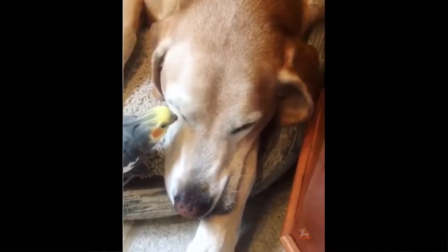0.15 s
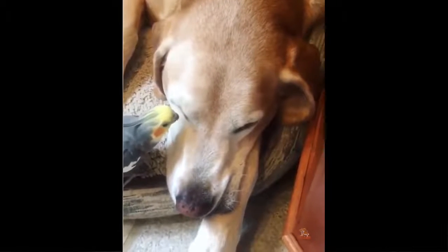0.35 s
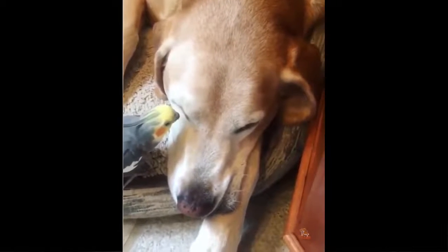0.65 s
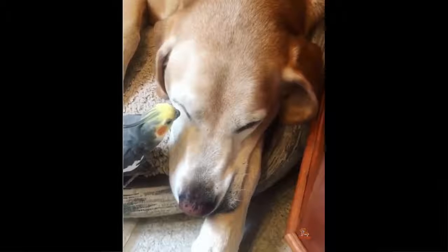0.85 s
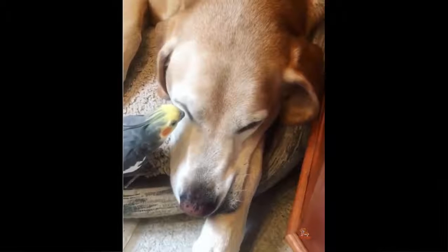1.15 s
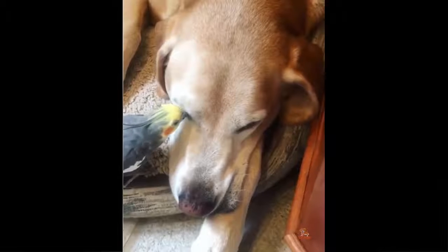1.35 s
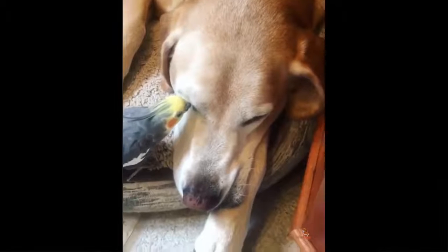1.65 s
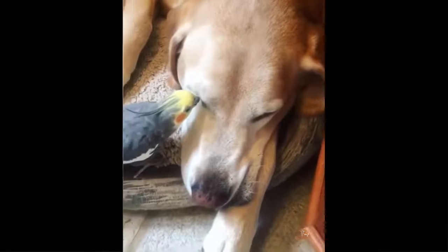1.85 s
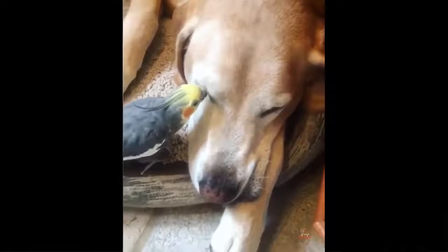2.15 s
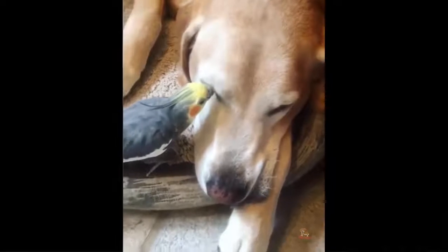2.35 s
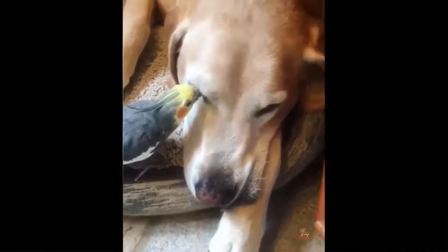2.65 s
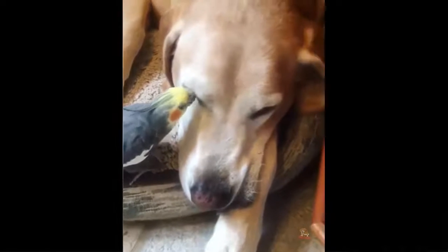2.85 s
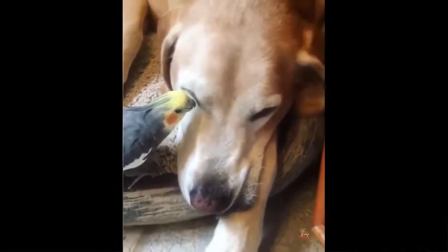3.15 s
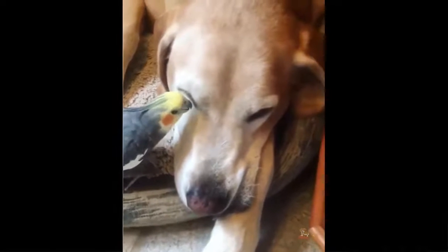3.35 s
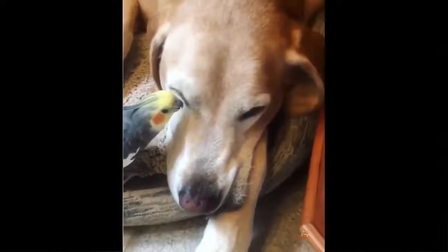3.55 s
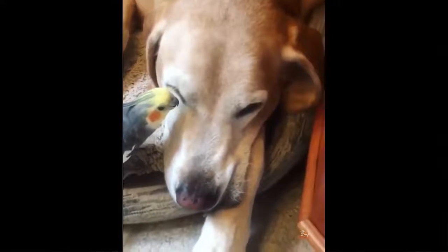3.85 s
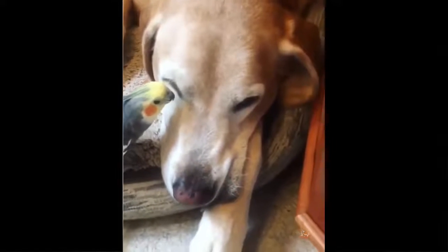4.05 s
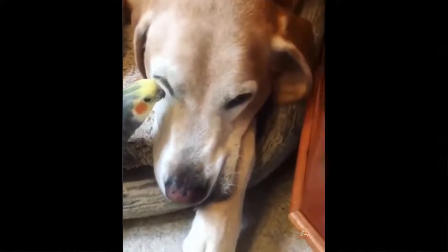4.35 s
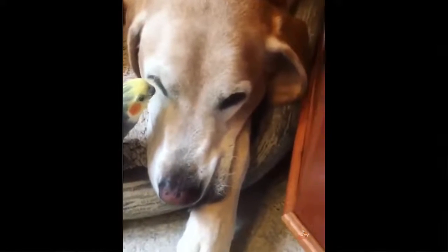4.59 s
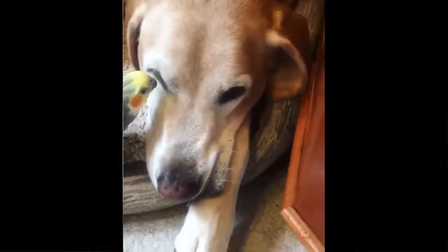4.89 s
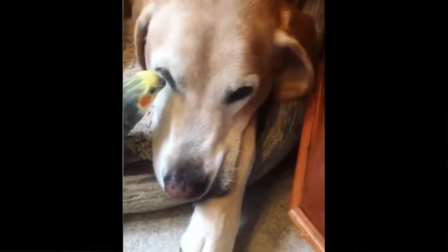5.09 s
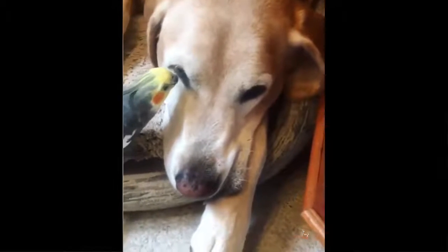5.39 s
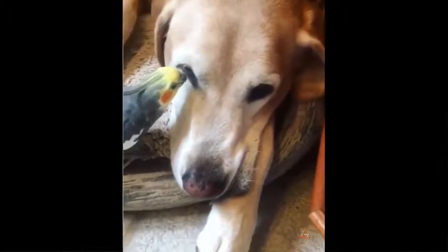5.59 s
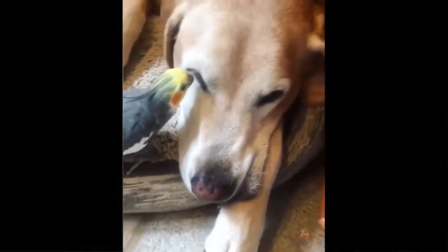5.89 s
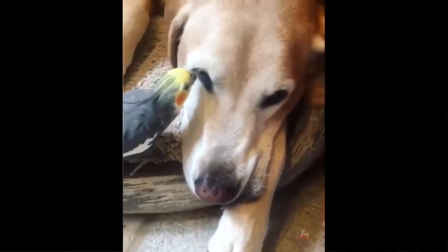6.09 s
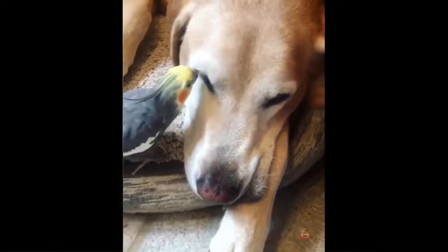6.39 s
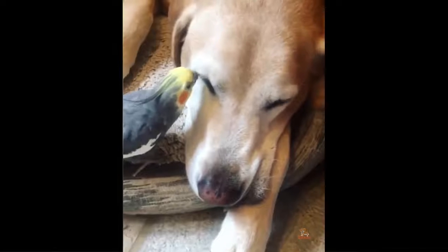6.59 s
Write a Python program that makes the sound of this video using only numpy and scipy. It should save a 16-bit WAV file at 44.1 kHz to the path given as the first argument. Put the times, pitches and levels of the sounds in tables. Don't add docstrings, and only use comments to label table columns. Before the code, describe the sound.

A small pet parrot whistles about a metre from a phone in a furnished room. The opening catches the tail of a sliding whistle, a rough fluttering gasp near 0.1 s, then swoops from 0.24 to 0.6 s, falling steeply from around 2.3 to 1.3 kHz, the second curving back up. A low floor rumble swells slightly around 0.6 s during the pause. A lone chirp comes at 1.5 s, then short piped chirps near 1.5 to 1.8 kHz from 1.8 to 3.4 s, some rising, some arching. Fast swoops return from 3.45 to 4.1 s with a small breathy gasp, the last dipping and climbing. After a gap, bright chirps run from 4.9 to 6.55 s, mostly in pairs. Very faint feather rustles fall between chirps. Notes are nearly pure, crisp at the attack, with a half-second room ring over quiet appliance hum, rumble and soft hiss.

```python
import sys
import numpy as np
from scipy import signal
from scipy.fft import rfft, irfft
from scipy.io import wavfile
from scipy.ndimage import uniform_filter1d

SR = 44100
rng = np.random.default_rng(int(sys.argv[2]) if len(sys.argv) > 2 else 0)


def to_linear_factor(level_db):
    exponent = np.asarray(level_db, float) / 20
    return 10 ** exponent


def unload_wav(signal):
    wavfile.write(
        sys.argv[1],
        SR,
        np.round(np.clip(np.atleast_2d(signal).T, -1, 1) * 32767).astype(np.int16),
    )


N = 296793
PRE = int(.1 * SR)
BLOCK = 12000


def on_log(hz, table, column=1):
    table = np.array(table)
    return np.interp(np.log(np.maximum(hz, 1)), np.log(table[:, 0]), table[:, int(column)])


def noise(size, colour):
    full = max(size, BLOCK)
    spectrum = rfft(rng.standard_normal(full))
    x = irfft(spectrum * to_linear_factor(on_log(np.fft.rfftfreq(full, 1 / SR), colour)), full)
    return x[:size] / x.std()


def walk(size, rate):
    k = max(int(SR / rate), 2)
    x = uniform_filter1d(rng.standard_normal(max(size, BLOCK)), k)
    return uniform_filter1d(x, k)[:size] * np.sqrt(1.57 * k)


def add(out, s, x):
    i = max(PRE + int(s * SR), 0)
    out[i:i + len(x)] += x[:len(out) - i]


def whistle(note, jitter=.0035, shimmer_db=4.):
    # frequency in Hz, gain in dB.
    beak_tone = [(600, -5.5), (2500, 15.5), (3700, 2.5), (4500, -1), (5300, -5.5), (6200, -11.5),
                 (7300, -21.5), (8300, -13), (9500, -14), (11500, -5.5), (13300, -3), (13900, -9),
                 (14400, -40)]
    # centre in Hz, width in Hz, gain in dB.
    side_branches = [(3800, 350, -18), (5350, 300, -15), (8300, 700, -14)]
    attack_s, release_s = .0025, .004
    air_db, air_s = -28, .013
    dive_air = .45

    s, *columns = np.transpose(note)
    t = np.arange(s[0], s[-1] + release_s, 1 / SR)
    curves = [uniform_filter1d(np.interp(t, s, c), 180, mode="nearest") for c in columns]
    hz, db, octave_db, mid_db, top_db = curves

    dive = np.clip(-np.gradient(np.log(hz)) * SR / 12, 0, 1)
    hz = hz * (1 + jitter * (1 + 2 * dive) * walk(len(t), 380))
    phase = 2 * np.pi * np.cumsum(hz) / SR

    order = np.arange(2, 12)[:, None]
    overtone_hz = order * hz
    beak = to_linear_factor(on_log(overtone_hz, beak_tone))
    top = np.clip((overtone_hz - 7500) / 2000, 0, 1) * (order > 2)
    mid = (1 - top) * (order > 2)
    size = 0
    for part, part_db in [(mid, mid_db), (top, top_db)]:
        shaped = part * beak
        size = size + to_linear_factor(part_db) * shaped / np.sqrt(np.sum(shaped ** 2, axis=0))
    size[0] = to_linear_factor(octave_db)
    for notch_hz, width_hz, notch_db in side_branches:
        size = size * to_linear_factor(notch_db * np.exp(-((overtone_hz - notch_hz) / width_hz) ** 2))

    wander = np.array([walk(len(t), 500) + walk(len(t), 60) for _ in order])
    flicker_db = (1 + .8 * dive) * shimmer_db * np.sqrt((order - 1.7) / 5) * wander
    flicker = to_linear_factor(-5 * dive + flicker_db)
    overtones = np.sum(size * flicker * np.sin(order * (phase + 2.1)), axis=0)
    tone = np.sin(phase) + overtones

    leak = np.exp(-((t - s[0]) / air_s) ** 2) + .06 + dive_air * dive
    air = to_linear_factor(air_db) * noise(len(t), beak_tone) * leak
    attack = np.clip((t - s[0]) / attack_s, 0, 1)
    release = np.clip((t[-1] - t) / (2 * release_s), 0, 1)
    return to_linear_factor(db) * attack * release * (np.sqrt(2) * tone + air)


def chirp(s, length, top_hz, db, bright_db, rule):
    first_hz, climb_s, sag, bright_s, upper_db, fade_db = rule
    least_climb = .008
    scoop, scoop_s = .025, .004
    sag_after_s, fade_s = .041, .01
    waver_share, waver_rate = .011, 130
    start_db, swell_s, closing_s = -3, .014, .009
    # octave, overtones to 8 kHz and above 8 kHz, in dB against the note
    open_db, closed_db, end_db = (-4, -21, -38), (-28, -31, -38), (-26, -40, -52)
    throat_hz, throat_width_hz, throat_db = 3500, 140, 30

    t = np.linspace(0, length, 40)
    first_hz = min(first_hz, top_hz * (1 - least_climb))
    hz = first_hz + (top_hz - first_hz) * np.clip(t / climb_s, 0, 1)
    hz = hz * (1 - sag * np.maximum(t - sag_after_s, 0))
    hz = hz * (1 - scoop * np.exp(-t / scoop_s))
    waver = walk(BLOCK, waver_rate)[(t * SR).astype(int)]
    hz = hz * (1 + waver_share * (waver - waver.mean()) * np.clip(t / swell_s, 0, 1))

    swell = start_db * np.clip(1 - t / swell_s, 0, 1)
    fade = fade_db * np.clip(1 - (length - t) / fade_s, 0, 1)
    closing = [bright_s, bright_s + closing_s, max(length, bright_s + 2 * closing_s)]
    octave, mid, top = (np.interp(t, closing, c) for c in zip(open_db, closed_db, end_db))
    lift = throat_db * np.exp(-((2 * hz - throat_hz) / throat_width_hz) ** 2)
    octave = bright_db + np.minimum(octave + lift, open_db[0])
    mid = mid + upper_db + bright_db / 2
    return np.transpose([s + t, hz, db + swell + fade, octave, mid, top + upper_db / 2])


def chirps(bird):
    # start in seconds, length in seconds, top pitch in Hz, level in dB, brightness in dB.
    openers = [(1.828, .051, 1525, -28, 0), (4.889, .048, 1540, -25.5, 4), (5.229, .043, 1492, -26, -2),
               (5.657, .049, 1540, -26, 1), (6.219, .049, 1635, -27, 4)]
    followers = [(1.966, .036, 1510, -27, -1), (2.525, .056, 1445, -33, 1), (2.972, .034, 1462, -29.5, -3),
                 (5.379, .034, 1425, -29.5, -2), (5.807, .035, 1445, -28.5, 2), (6.370, .036, 1490, -29, 3),
                 (6.527, .033, 1480, -28.5, 1)]
    climbers = [(2.095, .041, 1675, -27, 3), (3.082, .036, 1775, -26.5, 1), (5.929, .04, 1730, -25.5, 2)]
    arches = [(2.378, .053, 1600, -27.5, 3), (2.818, .064, 1640, -28, 2), (3.335, .07, 1575, -26.5, -1)]
    leaps = [(1.478, .066, 1635, -29, 1)]
    # first pitch in Hz, climb in seconds, sag in share of pitch per second,
    # bright time in seconds, upper overtones in dB, end fade in dB.
    opener_rule = (1500, .045, 0, .005, -3, -3)
    follower_rule = (1470, .012, 0, .015, 2, -5)
    climber_rule = (1480, .028, 0, .008, 3, -6)
    arch_rule = (1520, .02, 6, .004, -4, -3)
    leap_rule = (1530, .012, 0, .004, -5, -4)
    kinds = [(openers, opener_rule), (followers, follower_rule), (climbers, climber_rule),
             (arches, arch_rule), (leaps, leap_rule)]
    for rows, rule in kinds:
        for row in rows:
            add(bird, row[0], whistle(chirp(*row, rule)))


def slide(curve, octave_db):
    # pitch in Hz, then octave, overtones to 8 kHz and above 8 kHz, in dB against the note.
    slide_colour = [(1280, -20, -28, -42), (1500, -22, -31, -40), (1760, -12, -25, -33),
                    (1980, -29, -31, -32), (2400, -29, -34, -21)]
    climb_db, full_climb = -8, 8.
    s, hz, db = np.transpose(curve)
    t = np.linspace(s[0], s[-1], 60)
    hz, db = np.interp(t, s, hz), np.interp(t, s, db)
    climb = np.clip(np.gradient(np.log2(hz), t) / full_climb, 0, 1)
    thin = climb_db * climb * (t > s[1])
    octave, mid, top = (on_log(hz, slide_colour, column=k) + thin for k in range(1, 4))
    return np.transpose([t, hz, db, octave + octave_db, mid, top])


def slides(bird):
    # time in seconds, pitch in Hz, level in dB.
    slide_curves = [
        [(.239, 2092, -22), (.247, 2298, -23.5), (.285, 2183, -24.5), (.297, 1882, -27), (.31, 1536, -26),
         (.325, 1343, -31), (.346, 1280, -33)],
        [(.358, 2324, -43), (.385, 2219, -32.5), (.405, 1838, -30), (.43, 1590, -25), (.46, 1369, -31),
         (.5, 1259, -30), (.54, 1297, -30), (.575, 1520, -30), (.601, 1720, -32)],
        [(3.45, 2354, -35), (3.464, 2481, -26), (3.478, 2273, -26.5), (3.49, 1853, -31), (3.505, 1514, -27),
         (3.524, 1235, -34)],
        [(3.753, 2055, -31), (3.762, 2085, -29), (3.767, 2100, -39), (3.775, 2108, -29), (3.785, 2030, -41),
         (3.797, 1900, -28), (3.812, 1566, -25), (3.838, 1400, -28), (3.872, 1285, -36)],
        [(3.885, 2110, -42.5), (3.915, 2085, -33.5), (3.94, 1902, -25), (3.97, 1648, -23), (4.022, 1315, -30),
         (4.06, 1282, -30), (4.09, 1375, -32), (4.115, 1582, -27), (4.134, 1704, -35)],
    ]
    lead_in = [(-.09, 2660, -24), (-.04, 2540, -21), (-.03, 2150, -33), (.007, 2147, -26),
               (.016, 1500, -36), (.028, 1260, -30)]
    slide_octave_db = [-8, 5, 1, -1, -7, 0]
    for curve, octave_db in zip([lead_in] + slide_curves, slide_octave_db):
        add(bird, curve[0][0], whistle(slide(curve, octave_db)))


def gasp(length, first_hz, last_hz, db, hiss_db, flutter_hz=85., swing=.12):
    t = np.arange(int(length * SR)) / SR
    flap = 2 * np.pi * flutter_hz * t + 2.2 * walk(len(t), 90)
    hz = np.linspace(first_hz, last_hz, len(t))
    hz = hz * (1 - swing * np.cos(flap) + .07 * walk(len(t), 700))
    phase = 2 * np.pi * np.cumsum(hz) / SR
    tone = np.sqrt(2) * (np.sin(phase) + 0.1 * np.sin(2 * phase)) * to_linear_factor(2.5 * walk(len(t), 500))
    rush = to_linear_factor(hiss_db) * noise(len(t), [
        (400, -20.5), (800, -5.5), (1400, -1.5), (2300, 2), (3100, -20), (4500, -21.5), (6500, -26),
        (8300, -33), (12000, -16), (13900, -24), (14400, -52)])
    swell = np.sin(np.pi * t / length)
    puffs = 1 + 0.6 * np.sin(flap)
    return to_linear_factor(db) * puffs * (np.sqrt(swell) * tone + swell * rush)


def gasps(bird):
    # start in seconds, length in seconds, first and last pitch in Hz, level in dB,
    # air rush in dB against that level.
    gasp_rows = [(.058, .082, 1400, 1576, -34, -11), (0.344, .02, 1360, 1090, -56, 1),
                 (3.581, .04, 1837, 1400, -41, -12), (3.861, .02, 1250, 707, -53.5, 3)]
    for s, *sound in gasp_rows:
        add(bird, s, gasp(*sound))


def rustle(length, db):
    size = int(length * SR)
    grain = to_linear_factor(db + 2 * walk(size, 700))
    brush = noise(size, [(1000, -7.5), (5000, -1.5), (9000, -3), (13000, -5), (14400, -37.5)])
    return grain * np.sqrt(np.hanning(size)) * brush


def rustles(bird):
    # start in seconds, length in seconds, level in dB.
    rustle_rows = [(1.955, 0.013, -76), (2.24, 0.074, -74.5), (2.775, 0.038, -78), (5.1, 0.0095, -77.5),
                   (6.19, 0.035, -74), (6.319, 0.027, -83)]
    for s, *sound in rustle_rows:
        add(bird, s, rustle(*sound))


def room(x, gap_s=.004, build_s=.02):
    # band centre in Hz, level in dB, time to fall by 60 dB in seconds.
    echo_bands = [(800, -8, 0.36), (1400, -14.5, .55), (1750, -10, .5), (2150, -7.5, 0.5),
                  (2600, -12, 0.65), (3173, -7, .5), (5000, -10, 0.5), (8000, -6.5, 0.49),
                  (12500, -12.5, 0.23)]
    # delay in seconds, level in dB.
    bounces = [(.0021, -21.5), (.0068, -18), (.0135, -14.5), (.021, -25), (0.036, -18.5)]
    t = np.arange(int(.9 * SR)) / SR
    spectrum = rfft(rng.standard_normal(len(t)))
    hz = np.fft.rfftfreq(len(t), 1 / SR)
    echo = 0
    for k, (_, db, t60) in enumerate(echo_bands):
        part = on_log(hz, [(row[0], j == k) for j, row in enumerate(echo_bands)])
        rate = np.log(1000) / max(t60, .05)
        decay = np.sqrt(2 * rate / SR) * np.exp(-rate * t)
        echo = echo + to_linear_factor(db) * decay * irfft(spectrum * part, len(t))
    echo = echo * np.clip((t - gap_s) / build_s, 0, 1)
    for delay_s, db in bounces:
        echo[int(delay_s * SR)] += to_linear_factor(db)
    return signal.fftconvolve(x, echo)[:len(x)]


def appliance_hum():
    # frequency in Hz, level in dB, beat rate in Hz, beat depth from 0 to 1, beat phase in rad.
    hum_lines = [(56.8, -72, .4, .3, 0.5), (118, -65, 1.3, 0.5, 0), (230, -81.5, 1, 0.2, 0.),
                 (298, -77.5, 1.8, .2, 0.5), (358.2, -73, 4.7, 0.6, 1), (980, -85.5, .3, .6, 1),
                 (1955, -88.5, 0.087, 1, 2.5)]
    t = np.arange(N) / SR
    hum = np.zeros(N)
    for hz, db, beat_hz, depth, start in hum_lines:
        beat = 1 + depth * np.sin(2 * np.pi * beat_hz * t + start)
        hum += to_linear_factor(db) * np.sqrt(2) * beat * np.sin(2 * np.pi * hz * t + 0.62 * walk(N, 5.4))
    return hum


def floor_rumble():
    # time in seconds, level in dB.
    rumble_level = [(0, -69.5), (.45, -65.5), (.62, -56), (.95, -62), (1.3, -69), (3, -61), (6.73, -67.5)]
    level = to_linear_factor(np.interp(np.arange(N) / SR, *np.transpose(rumble_level)))
    return level * noise(N, [(30, -45.5), (45, 0.5), (60, 8.5), (85, -8.5), (150, -48.5)])


def soft_hiss(heard):
    # frequency in Hz, level in dB per Hz.
    hiss_colour = [(18, -37.5), (30, -12), (48, -5.5), (82, -9), (166, -7), (203, -11.5), (242, -11.5),
                   (320, -17.5), (345, -18), (529, -20), (680, -22.5), (734, -24.5), (1450, -27),
                   (2340, -37.5), (12300, -47), (16000, -78.5), (22000, -120)]
    hiss_db, hiss_top_hz, duck_db = -57, 12350, -7.0
    hiss = to_linear_factor(hiss_db - 5.5 + .6 * walk(N, 1)) * noise(N, hiss_colour)
    hiss = signal.sosfilt(signal.ellip(10, .3, 45, hiss_top_hz, fs=SR, output="sos"), hiss)
    loud = np.clip(uniform_filter1d(np.abs(heard), 3000) / .003, 0, 1)
    treble = signal.sosfilt(signal.butter(2, 1700, "high", fs=SR, output="sos"), hiss)
    return hiss - treble * (1 - to_linear_factor(duck_db * loud))


def scene():
    bird = np.zeros(N + PRE)
    chirps(bird)
    slides(bird)
    gasps(bird)
    rustles(bird)
    heard = (bird + room(bird))[PRE:]
    return (heard + soft_hiss(heard) + appliance_hum() + floor_rumble())[None]


def roll_off(x):
    return signal.sosfilt(signal.butter(12, 14350, fs=SR, output="sos"), x)


def record(dry):
    mix = signal.sosfilt(signal.butter(3, 38, "high", fs=SR, output="sos"), dry)
    mix = signal.sosfilt(signal.ellip(8, .3, 60, 14150, fs=SR, output="sos"), mix)
    return roll_off(mix)


dry = scene()
out = record(dry)
unload_wav(out)
```